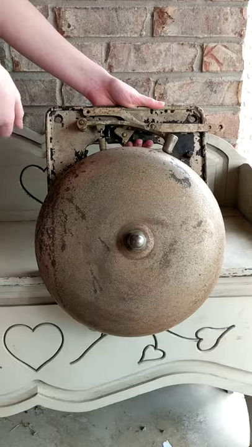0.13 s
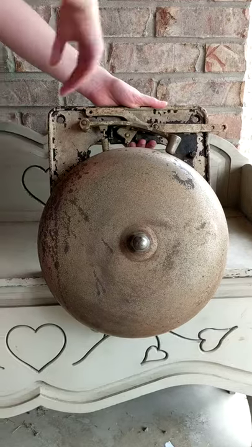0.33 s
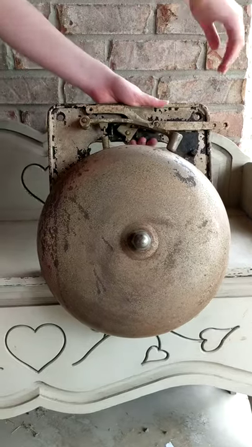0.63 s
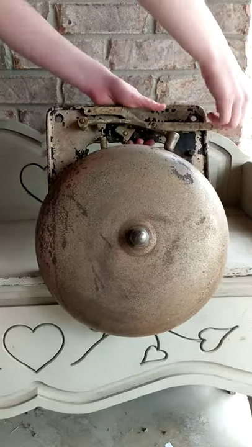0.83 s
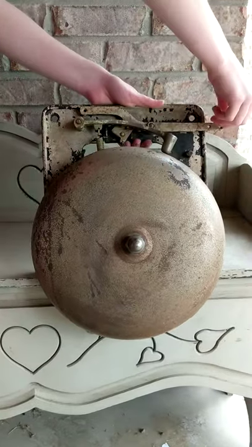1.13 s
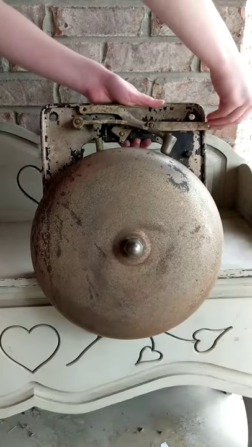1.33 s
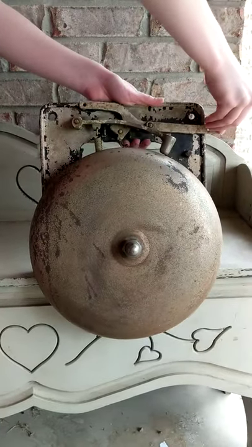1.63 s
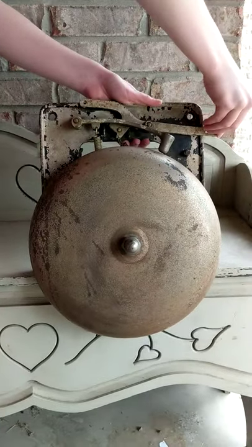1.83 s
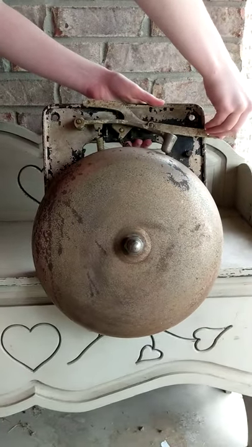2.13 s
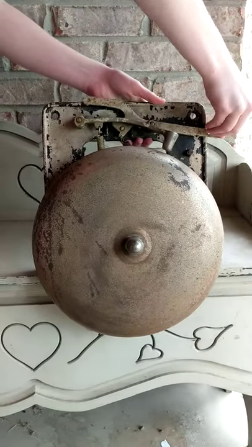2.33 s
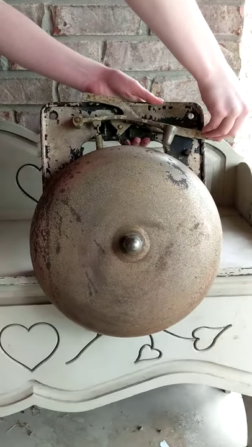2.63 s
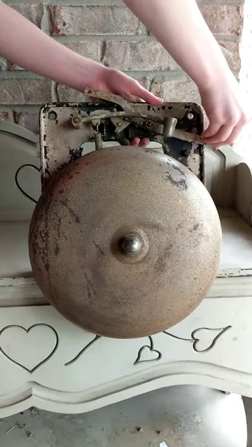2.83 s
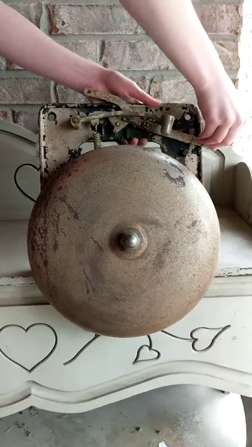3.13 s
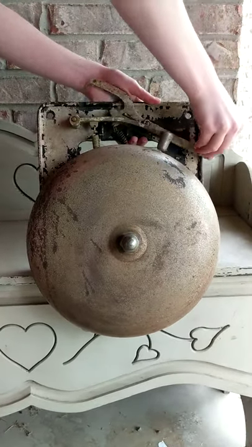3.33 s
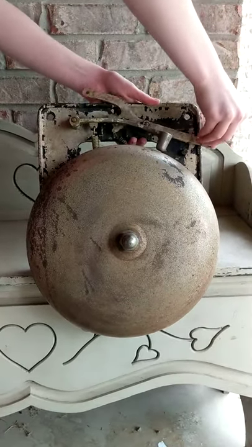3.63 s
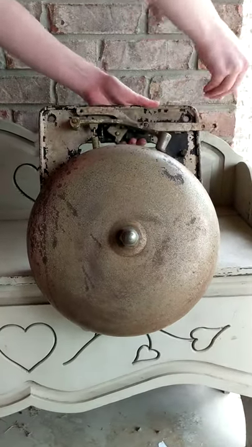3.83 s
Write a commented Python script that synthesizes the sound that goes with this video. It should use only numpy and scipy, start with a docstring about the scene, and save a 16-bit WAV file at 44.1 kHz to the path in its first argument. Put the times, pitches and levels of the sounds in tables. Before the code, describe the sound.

In a quiet room with faint birdsong outside, a lever is pulled with soft knocks. Then a nearby metal bell is struck hard and rings, sounding again more dully as the lever snaps back.

```python
"""Boxing bell on a wooden bench

A worn bell's lever is pulled down, clunks, and trips the hammer against the gong, whose paired modes
beat as they decay. On its way back the lever clacks home and jolts the gong again. An automatic gain
control ducks under the blow and recovers, so the low partials swell as the bright ones die.
The room is quiet; small birds chirp faintly outside."""
import sys
import numpy as np
from scipy import signal
from scipy.fft import rfft, irfft
from scipy.io import wavfile
from scipy.ndimage import uniform_filter1d

SR = 44100
rng = np.random.default_rng(int(sys.argv[2]) if len(sys.argv) > 2 else 0)


def master(y):
    """Save y as 16-bit WAV."""
    cut = np.clip(np.atleast_2d(y).T, -1, 1)
    pcm = np.round(cut * 32767)  # scale
    wavfile.write(sys.argv[1], SR, pcm.astype(np.int16))


N = 176400

# Blows on the gong: start_s, gain_db at the lowest mode, tilt_db_per_octave
GONG_BLOWS = [(3.4024, -2, 1), (3.789, 4.5, -10)]
# The gong's modes, plus a faint tone near twice 1617 Hz that follows that mode, each with a close twin:
# pitch_hz, twin_offset_hz
GONG_MODES = [(246, 4.5), (632, 2.6), (1093, 2.3), (1617, 3.7), (1979, 15.0), (2188, 4.2), (2196, 12),
              (2709, 4.0), (2814, 2.8), (3240, 3), (3490, 2.9), (4001, 3.9), (4210, 1.5), (4431, 25.0),
              (4988, 2.7), (5107, 3.2), (5192, 2.9), (5555, 10.0), (5631, 3.4), (5668, 4.1), (5709, 17),
              (5811, 3.2), (6419, 6.0), (6679, 2.0), (7187, 4.0), (7336, 2.0), (7525, 18.0), (7609, 3.1),
              (7677, 5), (8586, 3.0), (8798, 25.0), (9009, 6.7), (9120, 4.7), (9242, 5), (9610, 10.9),
              (9838, 3.7), (10049, 1.5), (10693, 5.0), (11085, 5), (11422, 8.3), (11499, 25), (11828, 13.3),
              (12527, 18.4), (13505, 6), (14252, 3.6), (14530, 6), (14970, 6), (15560, 8.0), (16440, 6)]
# Decay of the same pairs, in order: level_db, t60_s, twin_relative_db, twin_t60_s
GONG_DECAYS = [(-39, 40, -0.5, 0.98), (-31, 42, -18.0, 12), (-29, 2.32, -4.5, 3.5),
               (-24.5, 14.3, -5.5, 0.79), (-38.5, 1.5, 17, 0.467), (-30.5, 3.7, -3.5, 10.19),
               (3, 0.178, -18, 0.27), (-32, 0.5, -14, 6.6), (-2.5, 1.1215, -9, 0.86), (-43.5, 4, 19, 1.0),
               (-9.5, 1.1065, 5.5, 0.407), (3, 0.085, -7.5, 0.17), (-6.5, 0.5, -4, 0.501),
               (-24.5, 0.47, -2, 0.17), (-3.0, 0.372, -13.5, 0.407), (-15, 0.381, -11, 0.41),
               (-6, 0.079, 5, 0.204), (-12.5, 0.416, 13.5, 0.15), (-21, 0.993, 11, 0.41),
               (-4, 0.15, -11, 0.539), (-14.5, 0.417, -3.5, 0.24), (-17.5, 0.2, -3.5, 0.66),
               (4.5, 0.124, -6, 0.102), (2.5, 0.249, -19.5, 0.551), (-1, 0.213, -19.5, 0.2),
               (-19.5, 0.36, -7, 0.61), (2, 0.16, -9.5, 0.08), (-0.5, 0.242, 7, 0.16),
               (-36, 0.88, -16, 0.34), (-0.5, 0.35, 4, 0.3505), (-12, 0.22, -4.5, 0.14),
               (-9.5, 0.32, -23.5, 0.896), (-10.0, 0.3, -18.5, 0.31), (-4.5, 0.164, -6.5, 0.28),
               (3.5, 0.182, -18, 0.19), (-19.5, 0.37, -18.0, 0.49), (-26, 0.5, 1, 0.4),
               (-5, 0.218, -5.5, 0.24), (-30, 0.4, -6.5, 0.27), (-9.5, 0.244, -21.5, 0.52),
               (-32, 0.29, 0, 0.35), (-15.5, 0.197, -18.5, 0.15), (-30, 0.25, -0.5, 0.15),
               (-30, 0.25, -6, 0.18), (-25.5, 0.18, -3.5, 0.2), (-36, 0.22, -10, 0.2),
               (-43.5, 0.4, -1.5, 0.2), (-22, 0.13, -12, 0.16), (-21, 0.2, -10.5, 0.2)]
# The hammer crashing on the gong: start_s, level_db
HAMMER_HITS = [(3.4025, 2.5)]
# Spectrum of the crash: frequency_hz, relative_db
HAMMER_SPECTRUM = [(40, -14.5), (120, -3.5), (220, -12), (450, 0.5), (800, -8.5), (1500, -1.5),
                   (2800, -2.5), (4500, 7), (6500, 4), (9000, 0.5), (11500, -11), (15000, -18.5),
                   (17000, -33.5)]
# The lever catching and slipping on its pawl: start_s, level_db
PAWL_HITS = [(2.1755, -44.5), (2.181, -48), (2.193, -60.5), (3.382, -39)]
# Spectrum of the pawl's clunk: frequency_hz, relative_db
PAWL_SPECTRUM = [(40, -8.5), (130, 5), (250, -3.5), (450, 3), (750, -1), (1100, -7), (1800, -10.5),
                 (3200, -18.5), (5000, -29.5), (9000, -32), (12000, -49), (17000, -52.5)]
# A light lever tick just before the blow, then the lever snapping home and rattling: start_s, level_db
SNAP_HITS = [(3.373, -57), (3.777, -36), (3.7888, -19), (3.7925, -27), (3.804, -30)]
# Spectrum of the snap: frequency_hz, relative_db
SNAP_SPECTRUM = [(40, -5), (120, 3), (220, -4), (480, 3), (850, -2), (2000, -5), (4200, -9), (5500, -2),
                 (6000, -5), (6500, 2), (7300, -7), (8500, 2), (9600, -7), (10700, -14), (11300, -9),
                 (12500, -18), (15000, -19), (16000, -36), (17000, -42)]
# Decay of ironwork and room, before each impact's scaling: frequency_hz, t60_s
IRON_DECAY = [(100, 0.307), (400, 0.4203), (1200, 0.2764), (4000, 0.2297), (8000, 0.1712), (15000, 0.19)]
# Jolts to the back plate and bench: start_s, level_db
HOUSING_JOLTS = [(2.185, -37.5), (3.403, -19), (3.79, -32)]
# Modes of the back plate and bench: pitch_hz, relative_db, t60_s
HOUSING_MODES = [(141, 0, .42), (165, -6, .4), (408, -11, .3), (478, -5, .25), (705, -8, .18)]
# Knocks and creaks of the handled frame: start_s, level_db, centre_hz, width_hz, decay_s
FRAME_KNOCKS = [(.986, -49, 153.9, 50.5, 0.057), (1.165, -56.5, 265, 69.7, 0.06),
                (1.405, -49.5, 275.2, 34.8, 0.0493), (1.7, -65.5, 717.3, 89, 0.138),
                (2.345, -60, 536, 260, 0.0506), (2.76, -62.5, 470, 90, .07),
                (2.83, -52.5, 129.6, 60, 0.075), (3.785, -41, 98, 58.5, 0.047)]
# Dry scrapes of the lever: start_s, level_db, centre_hz, width_hz, decay_s
LEVER_SCRAPES = [(.95, -74, 7500, 4000, 0.263), (1.15, -70, 7000, 2500, 0.017),
                 (1.7, -69.5, 3830, 915, 0.228), (1.7, -74, 6000, 5000, 0.077),
                 (2.97, -71.5, 8120, 3000, 0.057)]
# Bird notes: start_s, length_s, first_hz, last_hz, level_db
BIRD_NOTES = [(0.193, 0.0577, 4290, 4326, -67), (0.245, 0.026, 3408, 2980, -64),
              (0.34, 0.088, 4300, 4300, -62.5), (0.364, .03, 4020, 2910, -60),
              (.418, 0.049, 3600, 2705, -64), (0.53, 0.034, 4900, 3030, -67),
              (0.652, 0.0386, 4900, 3050, -67), (0.768, 0.037, 4940, 3030, -64),
              (0.892, 0.0349, 4900, 3084, -62.5), (1.013, 0.0466, 4900, 2980, -60.5),
              (1.143, 0.0386, 4900, 3030, -64.5), (0.295, 0.037, 7360, 7220, -70.5),
              (0.453, 0.056, 7400, 7190, -71.5), (0.58, 0.037, 7400, 7250, -72),
              (0.713, 0.0394, 7280, 7100, -70.5), (.835, 0.029, 7200, 7200, -66),
              (.96, .03, 7220, 7180, -77.5), (0.512, 0.029, 4620, 4653, -65),
              (.765, 0.027, 4800, 4810, -67.5), (0.883, 0.033, 4900, 4730, -67.5),
              (1.01, 0.028, 4900, 4783, -69), (1.135, 0.039, 4840, 4815, -69.5),
              (1.382, 0.175, 6488, 6600, -69), (1.378, 0.1, 6980, 6720, -70),
              (1.71, 0.105, 4180, 4070, -67.5), (1.83, 0.0301, 3643, 3150, -72),
              (2.049, 0.047, 5510, 5250, -68.5)]
# Spectrum of the room tone: frequency_hz, relative_db
ROOM_SPECTRUM = [(25, -20.5), (45, -4.5), (76, 1.5), (98, -8.5), (125, -8), (172, -9.5), (205, -16.5),
                 (267, -18.5), (370, -25.5), (474, -24), (650, -26), (1100, -27.5), (1700, -33),
                 (3200, -36), (6000, -41.5), (9000, -44.5), (10500, -47.5), (16800, -54)]
# Room tone over time: time_s, level_db
ROOM_LEVELS = [(.1, -59.5), (.3, -57), (.5, -56), (1.9, -55), (2.6, -56.5), (3.3, -56)]


def gong(gain_db, tilt_db, modes, contact_s=0.00317, bloom_db=-12.5, bloom_s=0.0191):
    """Beating: two damped modes close in pitch pulse at their difference frequency."""
    t = np.arange(SR) / SR
    ring = np.zeros(SR)
    for (hz, offset_hz), (db, t60, twin_db, twin_t60) in modes:
        mode = amp(-60 * t / t60) * np.sin(2 * np.pi * hz * t)
        twin = amp(twin_db - 60 * t / twin_t60) * np.sin(2 * np.pi * (hz + offset_hz) * t)
        octaves = np.log2(hz / GONG_MODES[0][0])
        ring += amp(db + gain_db + tilt_db * octaves) * (mode + twin)
    bloom = amp(bloom_db * np.exp(-t / bloom_s))  # the ring builds up as the room answers
    return ring * np.minimum(t / contact_s, 1) * bloom


def shimmer_modes(count=64, level_db=-27, spread_db=6, t60_s=0.24):
    """Modal density: many weak pairs, scattered between the gong's strong ones, merge into a shimmer."""
    modes = []
    for hz, deviation in zip(rng.uniform(4300, 15500, count), rng.standard_normal(count)):
        rolloff_db = -20.5 * np.log2(max(hz / 8000, 1))
        db = level_db + spread_db * deviation + rolloff_db
        modes.append(((hz, 5), (db, t60_s, -6, t60_s)))  # columns as in GONG_MODES and GONG_DECAYS
    return modes


def impacts(hits, spectrum, crack_db, crack_s, t60_scale, tail_db, tail_t60_s):
    """Impulse response: after a crack, dense modes of ironwork and room die away as noise."""
    out = np.zeros(N)
    t = np.arange(SR) / SR
    crack = 1 + amp(crack_db) * np.exp(-t / crack_s)
    onset = np.minimum(t / 0.0015, 1)
    for start_s, level_db in hits:
        burst = noise(lambda hz: amp(at_frequency(spectrum, hz)), SR)
        band_hz, age_s, bands = signal.stft(burst, SR, nperseg=256)
        t60_s = t60_scale * at_frequency(IRON_DECAY, band_hz)[:, None]
        decay = amp(-60 * age_s / t60_s) + amp(tail_db - 60 * age_s / tail_t60_s)
        ring = signal.istft(bands * decay, SR, nperseg=256)[1][:SR]
        add(out, start_s, amp(level_db) * ring * crack * onset)
    return out


def housing(level_db, rise_s=0.006):
    """Free vibration: the jolted back plate and bench give a hollow knock in a few low modes."""
    t = np.arange(SR) / SR
    ring = sum(amp(level_db + db - 60 * t / t60) * np.sin(2 * np.pi * hz * t)
               for hz, db, t60 in HOUSING_MODES)
    return ring * np.minimum(t / rise_s, 1)


def rub(level_db, centre_hz, width_hz, decay_s, rise_s=0.00555):
    """Broad resonance: a knock or scrape excites a short shudder in one band of noise."""
    t = np.arange(SR // 2) / SR
    band = noise(lambda hz: 1 / (1 + (2 * (hz - centre_hz) / width_hz) ** 4), len(t))
    envelope = np.minimum(t / rise_s, 1) * np.exp(-(t / decay_s) ** 2)
    return amp(level_db) * unit(band * envelope) * np.sqrt(np.mean(envelope ** 2))


def birds(flutter_db=6.5, flutter_s=0.004, swell_db=9, direct_db=-3, echo_db=-4, echo_t60_s=0.28):
    """Reverberation: reflections blur distant whistles, most of which fall in pitch as they swell."""
    calls = np.zeros(N)
    for start_s, length_s, first_hz, last_hz, level_db in BIRD_NOTES:
        progress = np.linspace(0, 1, round(length_s * SR))
        pitch_hz = last_hz + (first_hz - last_hz) * (1 - progress) ** 1.3  # the glide slows at its end
        flutter = unit(uniform_filter1d(rng.standard_normal(len(progress)), round(flutter_s * SR)))
        gain = amp(level_db + flutter_db * flutter + swell_db * (progress - 1))
        arch = np.sqrt(abs(np.sin(np.pi * progress)))
        add(calls, start_s, gain * arch * np.sin(2 * np.pi * np.cumsum(pitch_hz) / SR))
    t = np.arange(SR // 2) / SR
    reflections = rng.standard_normal(len(t)) * amp(-60 * t / echo_t60_s)
    echo = signal.fftconvolve(calls, reflections / np.linalg.norm(reflections))[:N]
    return amp(direct_db) * calls + amp(echo_db) * echo


def room_tone(low_cut_hz=28):
    """Ambient noise: a continuous spectrum, strong in low rumble and faint in hiss."""
    air = noise(lambda hz: amp(at_frequency(ROOM_SPECTRUM, hz)) * hz**2 / (hz**2 + low_cut_hz**2), N)
    level_db = np.interp(np.arange(N) / SR, *np.transpose(ROOM_LEVELS))
    return air * amp(level_db)


def amp(db):
    """Decibels as an amplitude ratio."""
    return 10 ** (np.asarray(db) / 20)


def unit(x):
    """Normalisation to rms 1."""
    return x / np.sqrt(np.mean(x ** 2) + 1e-20)


def at_frequency(table, hz):
    """Interpolation on a log-frequency axis."""
    table_hz, values = np.transpose(table)
    return np.interp(np.log(hz + 1), np.log(table_hz + 1), values)


def add(mix, start_s, sound):
    """Superposition of a sound on the mix."""
    part = mix[round(start_s * SR):][:len(sound)]
    part += sound[:len(part)]


def noise(gain_at, size):
    """Spectral shaping: white noise weighted by gain_at(hz), at rms 1."""
    white = rfft(rng.standard_normal(size))
    return unit(irfft(white * gain_at(np.fft.rfftfreq(size, 1 / SR)), size))


def scene():
    """Superposition: the bell, its mechanism and the background sum in one channel."""
    mix = room_tone() + birds()
    mix += impacts(HAMMER_HITS, HAMMER_SPECTRUM, crack_db=-39.5, crack_s=0.0037,
                   t60_scale=0.8, tail_db=-37, tail_t60_s=0.85)
    mix += impacts(PAWL_HITS, PAWL_SPECTRUM, crack_db=-18, crack_s=0.0025,
                   t60_scale=0.877, tail_db=-40.5, tail_t60_s=1.0)
    mix += impacts(SNAP_HITS, SNAP_SPECTRUM, crack_db=7, crack_s=0.003,
                   t60_scale=0.885, tail_db=-32.5, tail_t60_s=1.0)
    modes = list(zip(GONG_MODES, GONG_DECAYS)) + shimmer_modes()
    for start_s, gain_db, tilt_db in GONG_BLOWS:
        add(mix, start_s, gong(gain_db, tilt_db, modes))
    for events, source in (HOUSING_JOLTS, housing), (FRAME_KNOCKS, rub), (LEVER_SCRAPES, rub):
        for start_s, *settings in events:
            add(mix, start_s, source(*settings))
    return mix[None]


def record(dry):
    """Compression: gain falls as power passes a threshold; soft clipping and a low-pass follow."""
    threshold_db, share_removed, attack_s, recovery_db_per_s = -27, 0.4593, 0.0042, 124
    silent_until_s, cutoff_hz = 0.098, 17000
    t = np.arange(N) / SR
    pole = np.exp(-1 / (attack_s * SR))
    power_db = 10 * np.log10(signal.lfilter([1 - pole], [1, -pole], dry[0] ** 2) + 1e-12)
    fall_db = t * recovery_db_per_s
    held_db = np.maximum.accumulate(power_db + fall_db) - fall_db  # each peak is held and sinks steadily
    excess_db = uniform_filter1d(np.maximum(held_db - threshold_db, 0), size=64)
    ducked = dry * amp(-share_removed * excess_db) * (t > silent_until_s)
    clipped = ducked / (1 + ducked ** 8) ** (1 / 8)
    low_pass = signal.firwin(511, cutoff_hz, window=("kaiser", 9), fs=SR)
    return signal.oaconvolve(clipped, low_pass[None], "same")


dry = scene()
out = record(dry)
master(out)
```